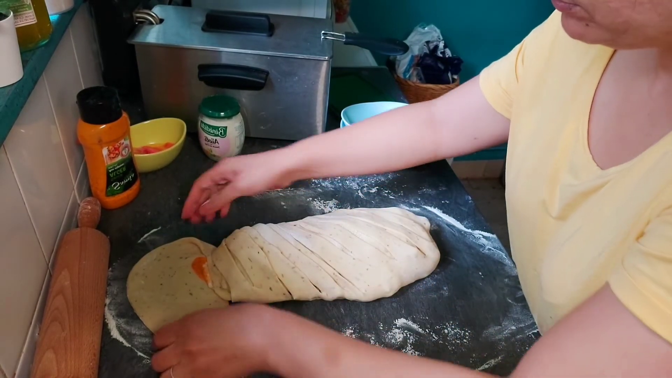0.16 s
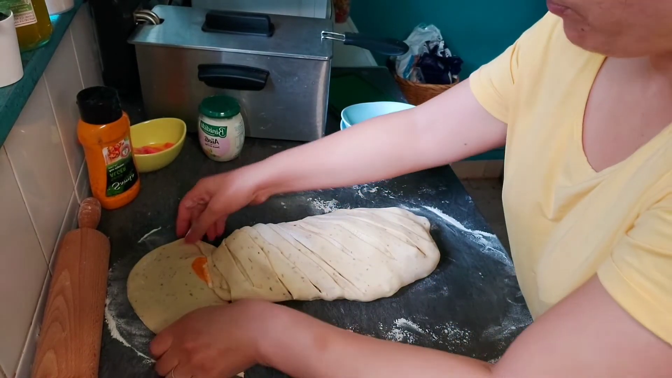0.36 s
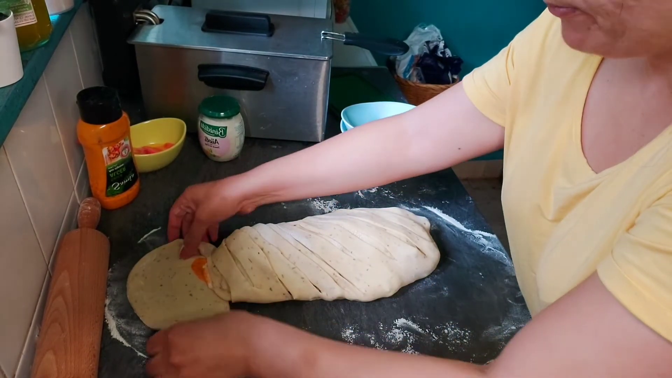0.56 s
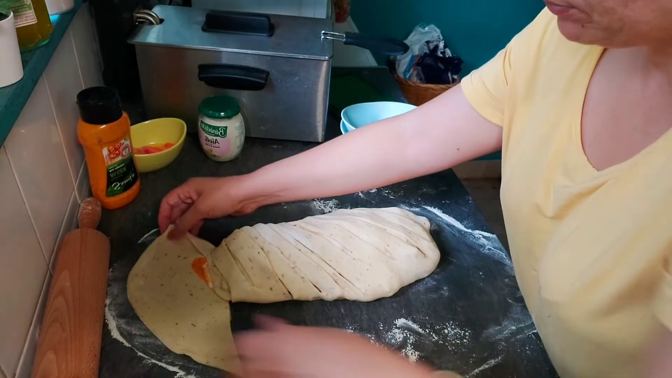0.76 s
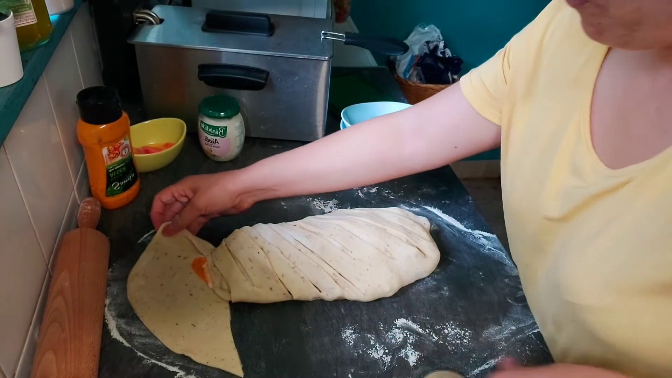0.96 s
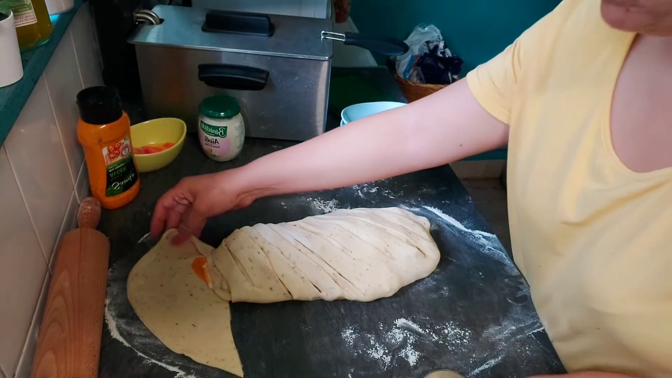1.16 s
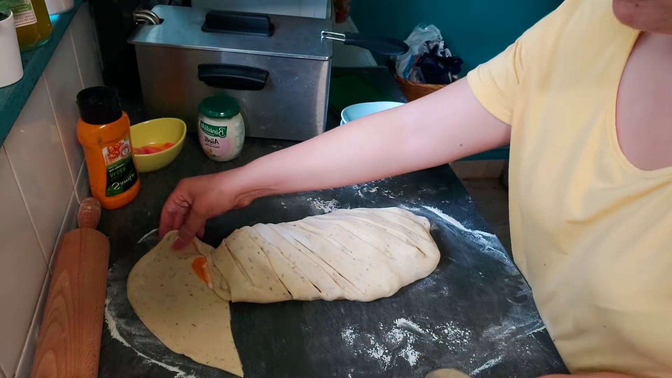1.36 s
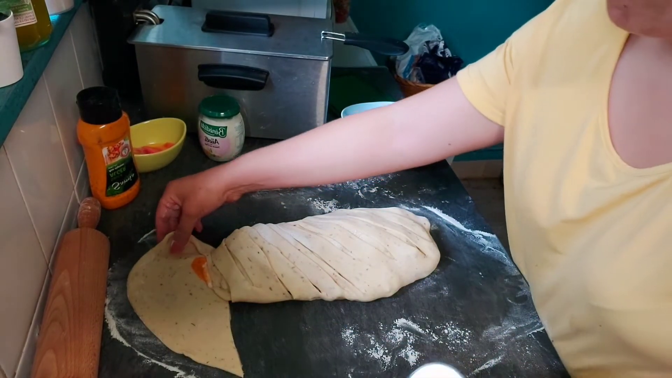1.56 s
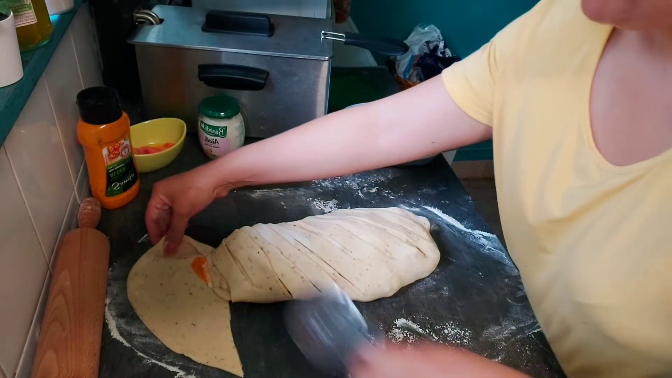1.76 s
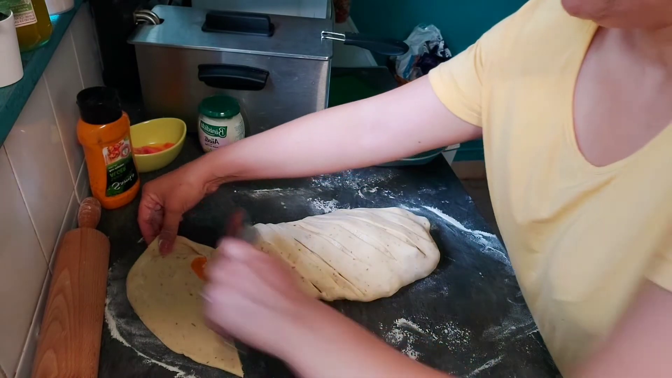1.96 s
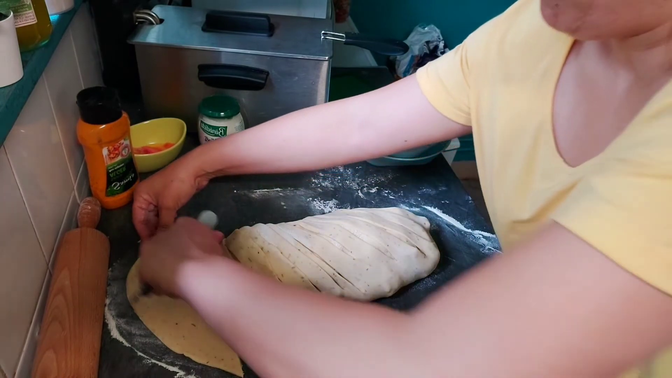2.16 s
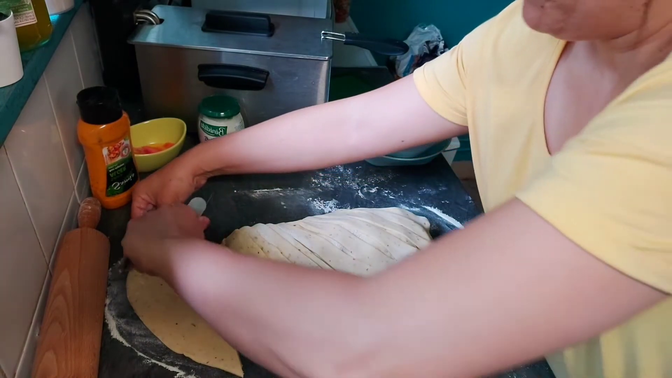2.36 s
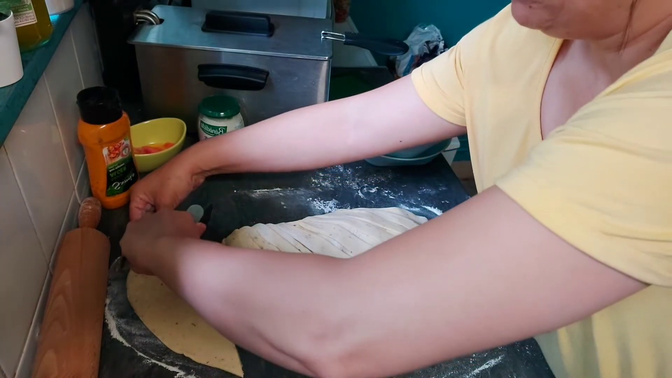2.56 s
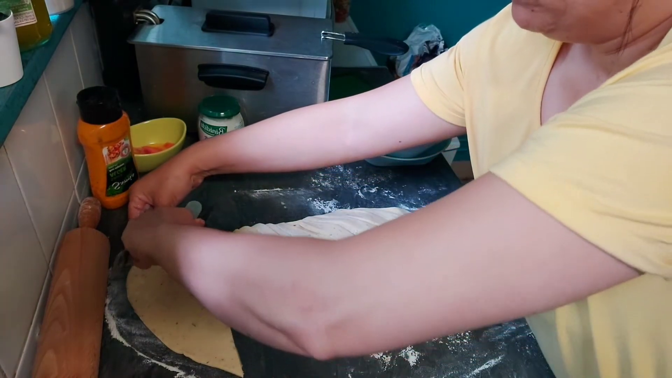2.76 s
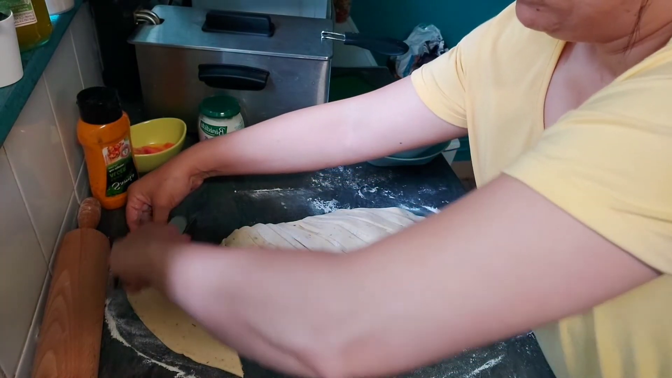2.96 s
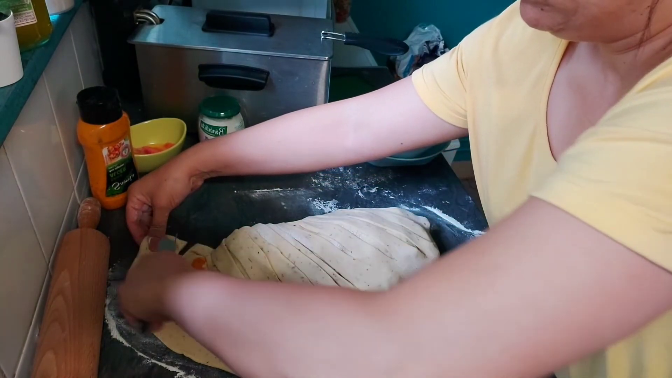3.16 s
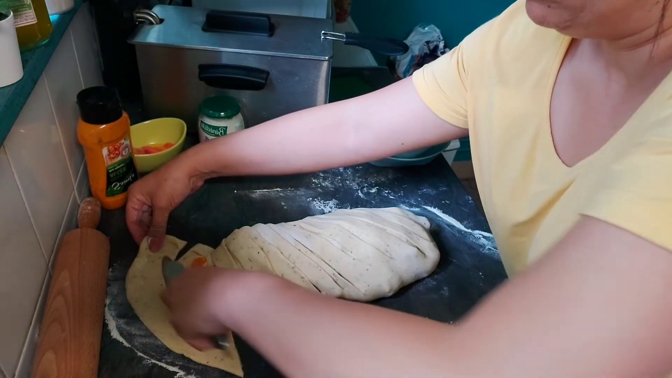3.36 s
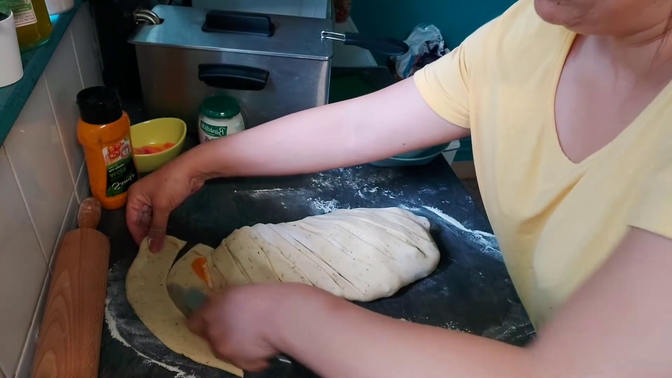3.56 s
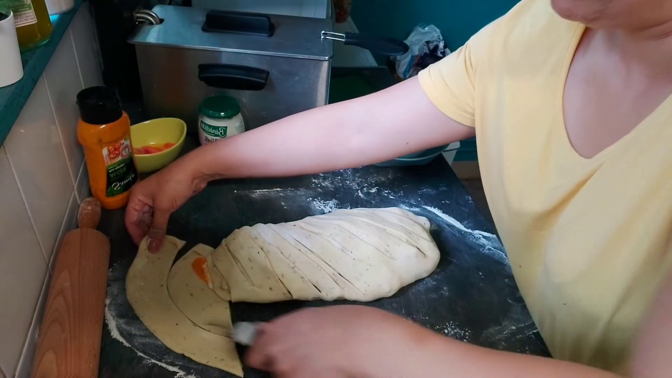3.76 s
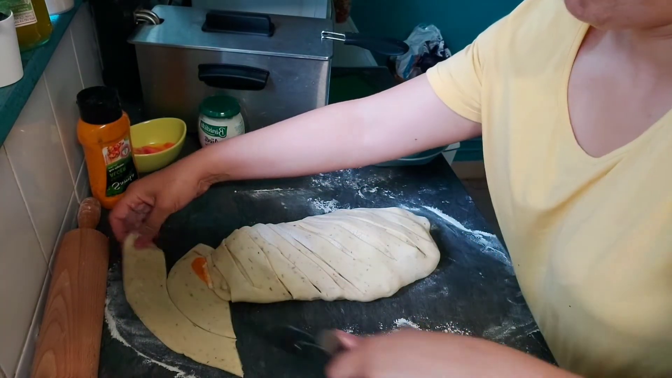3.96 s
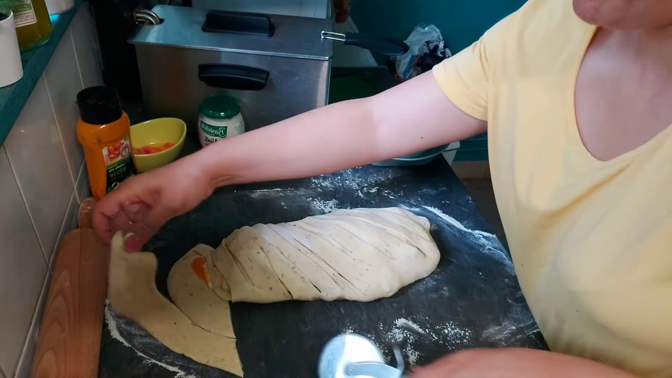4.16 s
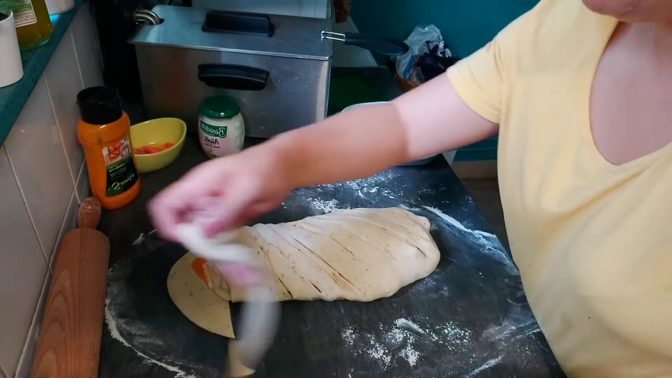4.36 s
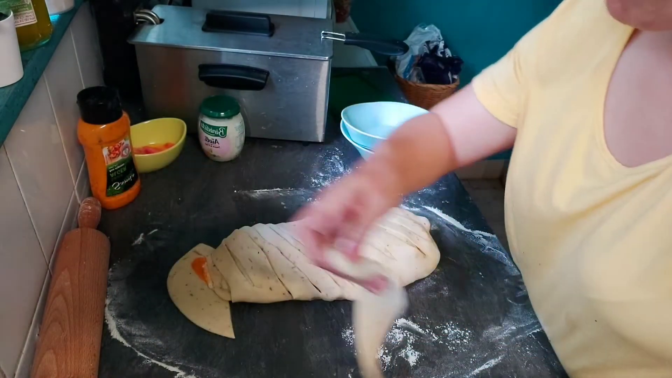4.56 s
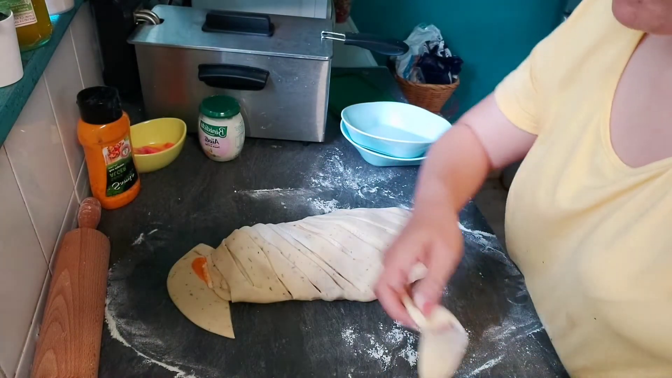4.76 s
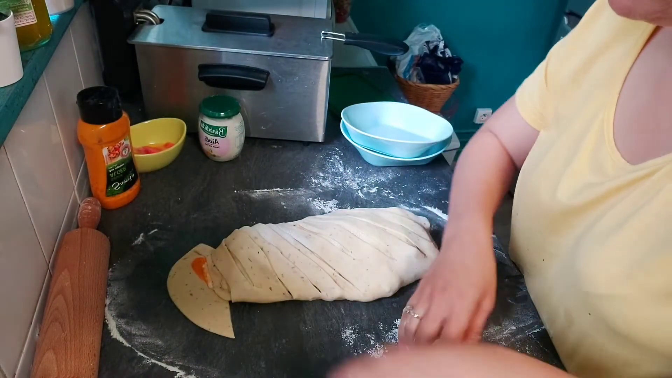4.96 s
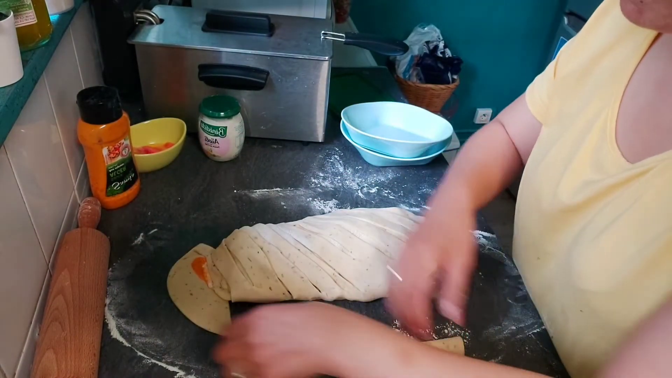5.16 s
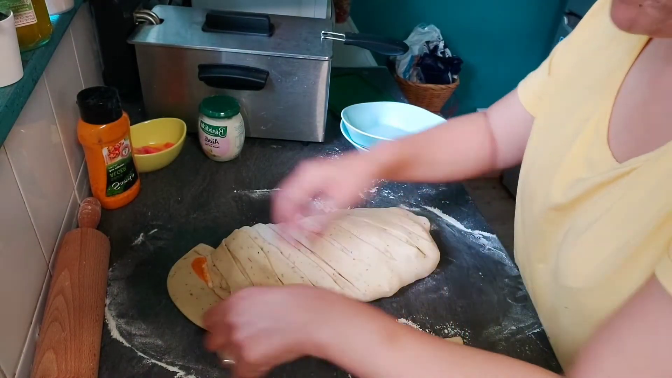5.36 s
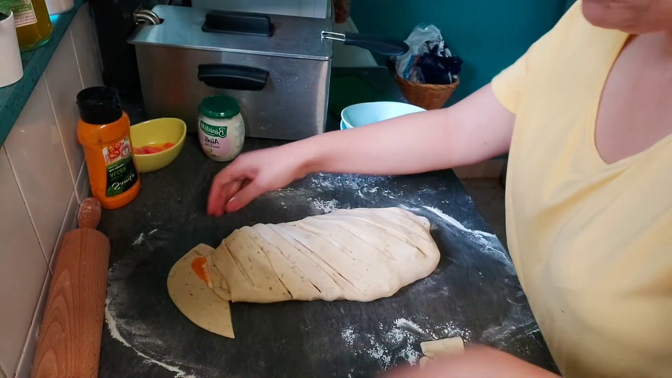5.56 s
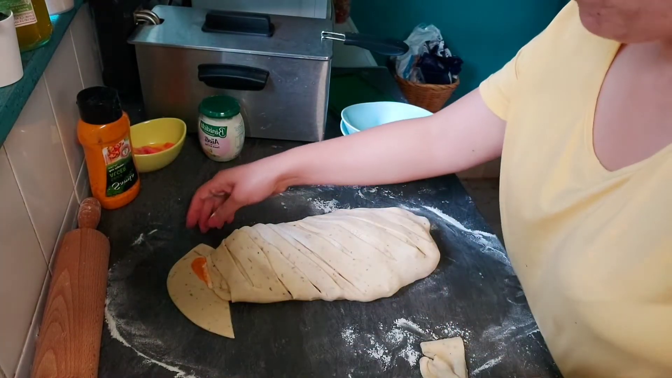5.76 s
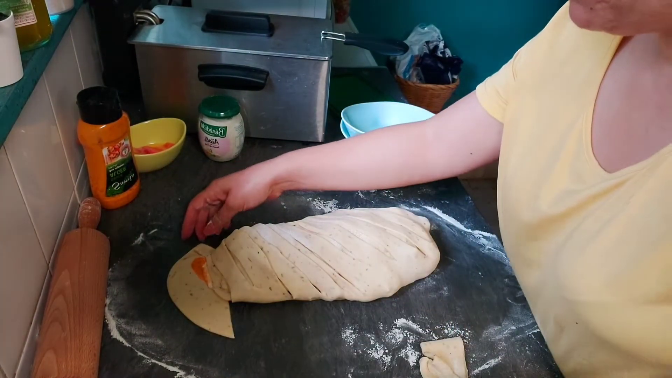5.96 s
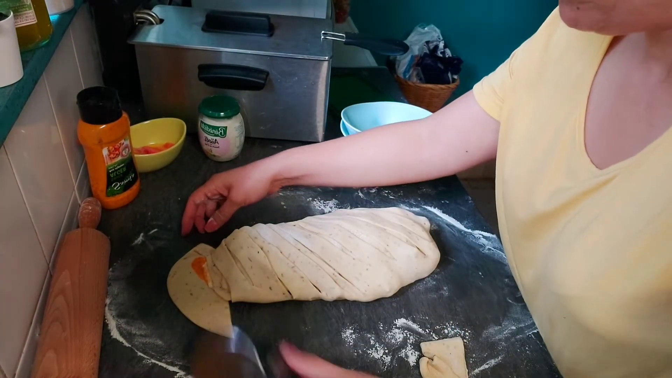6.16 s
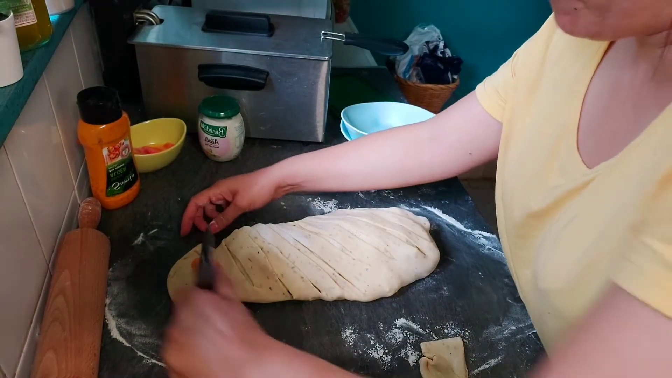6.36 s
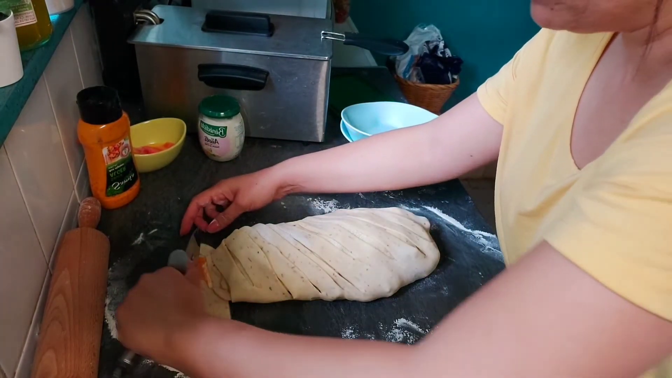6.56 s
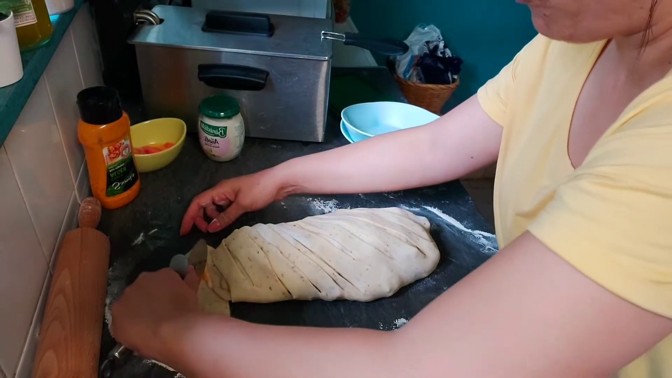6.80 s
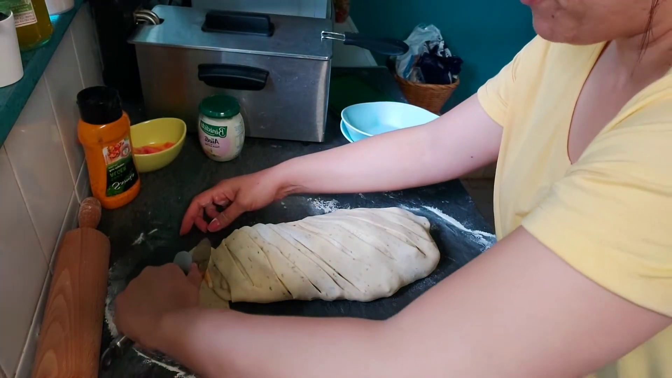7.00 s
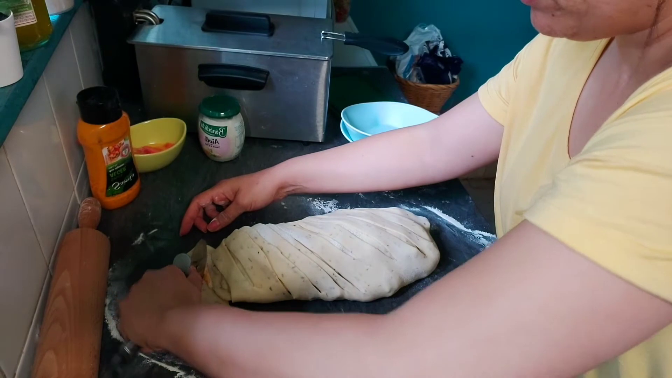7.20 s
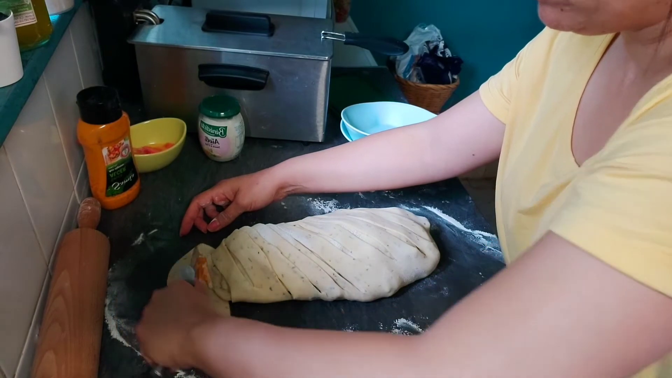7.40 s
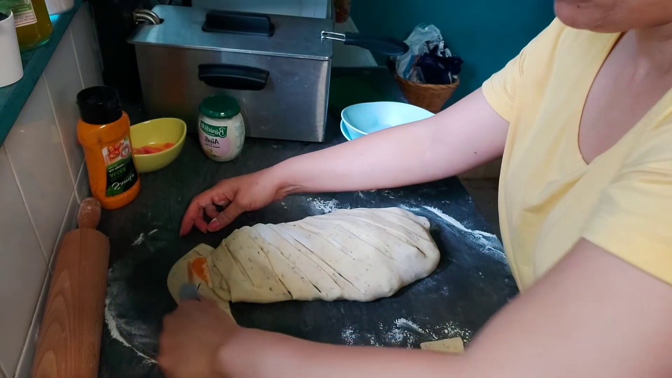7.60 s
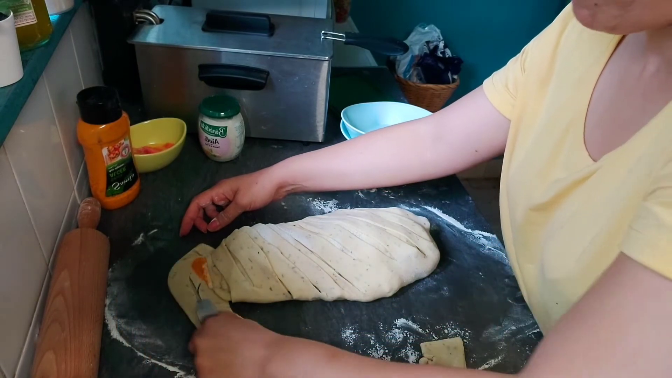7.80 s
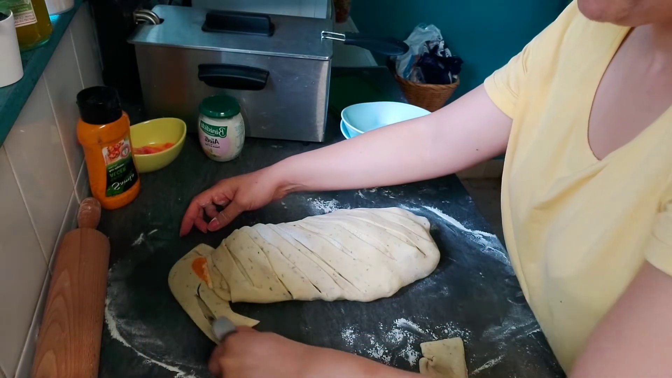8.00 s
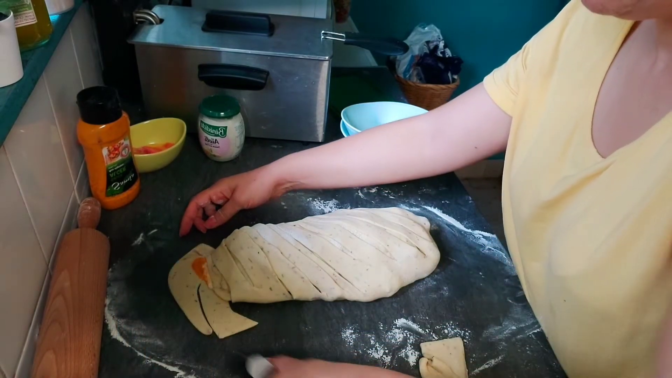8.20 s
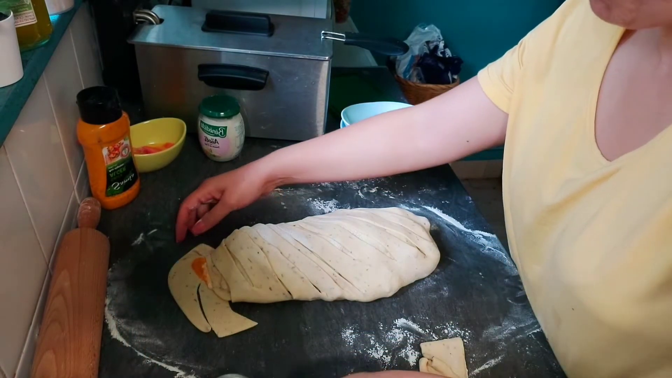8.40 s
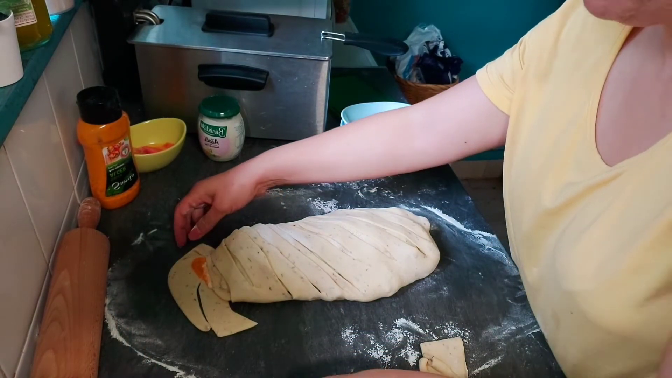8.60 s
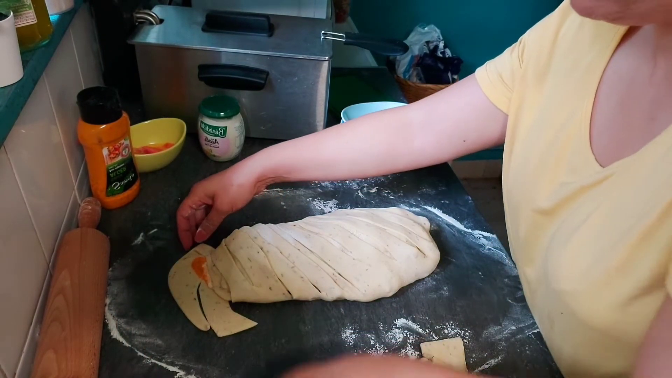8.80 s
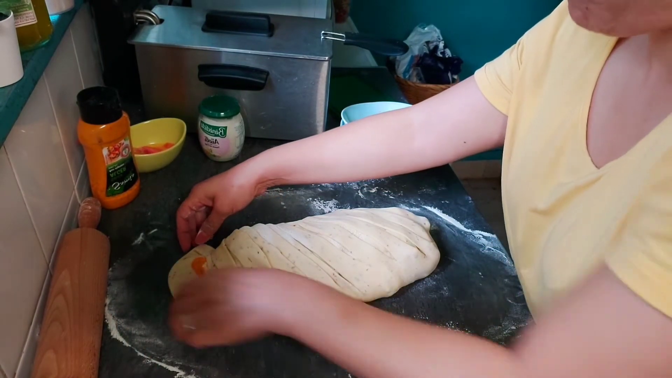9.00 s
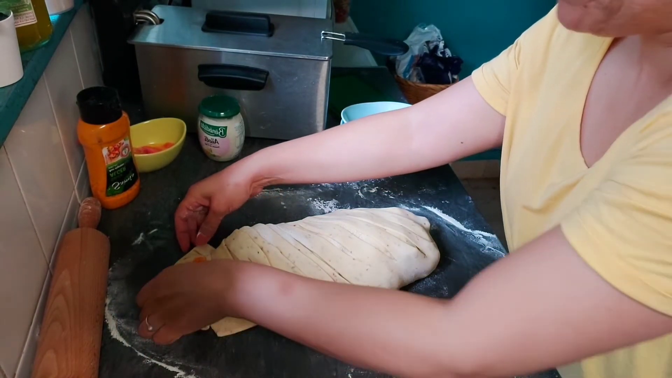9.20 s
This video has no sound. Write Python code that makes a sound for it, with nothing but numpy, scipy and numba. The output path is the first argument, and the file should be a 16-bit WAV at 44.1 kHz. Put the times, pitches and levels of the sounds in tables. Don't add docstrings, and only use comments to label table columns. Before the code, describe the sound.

A small loose steel dough cutter clacks and clinks on a stone counter, rolls through dough with soft rubbing rumbles, in a quietly ticking kitchen.

```python
import sys
import numpy as np
from scipy import signal
from scipy.fft import rfft, irfft
from scipy.io import wavfile
from numba import njit

SR = 44100
rng = np.random.default_rng(int(sys.argv[2]) if len(sys.argv) > 2 else 0)


def waveform_to_disk(signal):
    frames = np.transpose(np.atleast_2d(signal))
    scaled = np.clip(frames, -1, 1) * 32767
    samples = np.round(scaled).astype(np.int16)
    wavfile.write(sys.argv[1], SR, samples)


def magnitude_from_level(level_db):
    exponent = np.asarray(level_db, float) / 20
    return 10 ** exponent


N = 407660
TIME = np.arange(N) / SR

# pitch in Hz, level in dB.
AIR_COLOUR = [(15, -46.5), (25, -20), (65, 3), (103, 7.5), (182, -17.5), (288, -7.5), (669, -20),
              (979, -17.5), (1090, -9.5), (1360, -22.5), (2900, -30), (7300, -25.5), (10100, -35.5),
              (15200, -32), (16500, -55)]
# pitch in Hz, level in dB.
TICK_COLOUR = [(1470, -42.5), (2500, -10.5), (3140, -14), (4140, -5), (6210, -4.5), (7380, -1),
               (8900, -14.5), (13000, -23.5)]
# pitch in Hz, time to fade by 60 dB in seconds.
ROOM_FADE = [(120, 0.55), (400, 0.32), (2000, 0.31), (6000, 0.35), (14000, 0.13)]
# time in seconds, samples by which the left port hears it earlier.
LEFT_LEAD = [(0, 12), (1.2, 2), (2.2, 2), (2.6, 20), (3.3, 20), (3.8, 7), (4.2, 16), (5.2, 16), (5.6, 5),
             (6.6, 16), (7.5, 12), (8.7, 10), (9.1, 20)]

# pitch in Hz, level in dB, time to fade by 60 dB in seconds.
COUNTER_MODES = [(123, -21.5, 0.77), (204, -30, 0.6), (274.6, 0.5, 0.21), (405, -16.5, 0.094),
                 (601, -21, 0.18), (733, -24.5, 0.14), (900, -32, 0.23), (993, -20.5, 0.13),
                 (1334, -16, 0.04), (1630, -38, 0.33), (1821, -38.5, 0.26)]
# peak in seconds, deep rumble in dB, rise and fall in seconds.
PRESSES = [(.0, -50, 0.11, 0.047), (.266, -61.5, 0.03, 0.57), (.79, -72.5, 0.11, .6),
           (1.001, -57, 0.12, 0.16), (3.041, -54.5, 0.069, 0.061), (3.795, -32.5, 0.15, 0.045),
           (5.559, -56, 0.021, 0.26), (5.626, -46.5, 0.008, 0.25), (5.7, -61.5, 0.044, 0.066),
           (5.747, -35, 0.0273, 0.086), (7.636, -68.5, 0.093, 0.12), (8.168, -32, 0.18, 0.048),
           (1.512, -30.5, 0.16, 0.071), (9.09, -46, 0.042, 0.99)]
# peak in seconds, slab ring in dB, rub in dB relative to it,
# rise and fall in seconds.
ROLLS = [(0.37, -52.5, -20, 0.22, 0.1), (1.268, -33, -0.5, 0.027, 0.079), (2.611, -35, -4, 0.034, 0.24),
         (2.69, -39, -13, 0.077, 0.02), (3.45, -52, -13, 0.42, 0.29), (3.54, -34.5, -25.5, 0.032, 0.29),
         (5.731, -52.5, 2.5, 0.047, 0.068), (7.369, -61.5, 11, 0.1, 0.22), (7.469, -52, -2, 0.088, 0.32),
         (2.75, -46, -7.5, 0.025, 0.029), (7.728, -50, 4, 0.083, 0.035), (8.03, -54, 7.5, 0.073, 0.49),
         (7.6, -44.5, -9.5, 0.43, 0.26), (7.89, -44.5, -10, 0.24, 0.089), (8.172, -24, -10.5, 0.19, 0.019)]
# pitch in Hz, level in dB.
RUB_COLOUR = [(350, -28), (700, -4), (1000, 0), (1400, -6), (1900, -13), (2600, -20), (4500, -36)]
# pitch in Hz, level in dB.
GRIT_COLOUR = [(1180, -8), (2000, 3.5), (2760, -3), (6090, 9), (6590, 12), (8700, -22.5), (10300, -8),
               (16000, -42)]
# time in seconds, dB by which the upper squeak is raised and the lower
SQUEAK = [(2.5, 6.5), (3.3, -3), (5.8, 5.5), (7.35, 3), (7.5, 5.5), (7.65, 4), (7.8, -0.5), (7.95, 2.5),
          (8.2, 1.5)]
# pitch in Hz, level in dB.
DEEP_COLOUR = [(40, -31.5), (80, -19.5), (200, 0), (350, 2.5), (500, -7.0), (1000, -41.0)]
UPPER_COLOUR = [(250, -27.5), (450, 1.5), (700, 0.5), (900, -17.0), (1600, -47.0)]

# start in seconds, peak in
# dB, pitch in Hz, fade by 60 dB in seconds.
SPOT_TAPS = [(.001, -58, 2390, 0.17), (1.2583, -24.5, 3210, 0.027), (1.2577, -26.5, 4970, 0.022),
             (1.258, -22.5, 9160, 0.023), (1.3964, -14.5, 3460, 0.053), (1.3944, -12.5, 5400, 0.033),
             (1.573, -11.5, 5560, 0.025), (1.5718, -18, 8940, 0.023), (1.5734, -30, 2280, 0.033),
             (2.589, -34, 1190, .04), (2.6037, -36, 5560, 0.028), (2.6035, -51, 4300, 0.037),
             (2.641, -21.5, 1180, 0.093), (2.734, -40, 1305, .08), (2.735, -51, 490, 0.08),
             (3.5387, -25, 5500, 0.045), (3.5373, -20.5, 643, 0.059), (3.7272, -35, 5570, .05),
             (3.775, -29, 274.6, 0.26), (3.8074, -29.5, 1933, 0.053), (3.8054, -36, 3910, .2),
             (4.4003, -9, 7400, 0.1), (4.404, -16.5, 2860, 0.041), (4.3977, -19, 1810, .03),
             (4.4756, -20.5, 970, 0.023), (4.4745, -13.5, 1995, 0.07), (4.4785, -16, 650, 0.03),
             (4.7562, -28, 3580, 0.064), (4.794, -24, 466, 0.066), (4.7955, -38.5, 78, 0.82),
             (5.62, -51, 300, 0.23), (6.44, -49.5, 710, 0.17), (5.7383, -35.5, 2170, 0.038),
             (5.7566, -11, 2925, 0.042), (5.8268, -26, 3100, .03), (5.953, -31.5, 570, 0.16),
             (5.9919, -33, 3870, 0.14), (6.2377, -38, 3870, 0.16), (6.348, -30, 3908, .3),
             (8.156, -19, 1352, .12), (8.155, -27, 283, 0.26), (8.1638, -32.5, 3927, 0.19),
             (8.4139, -30, 3886, .3), (8.593, -9.5, 3630, 0.043), (8.6818, -16, 3310, 0.039),
             (8.8013, -12.5, 6440, 0.02), (8.8028, -30, 123, 1), (9.1004, -40.5, 3200, .03),
             (9.1149, -32, 250, .15),
             (1.243, -41, 82.5, .4), (1.3956, -10, 6810, 0.029), (1.5, -28, 280, 0.06),
                 (1.52, -38, 280, 0.049), (1.58, -33, 3890, 0.28), (1.796, -37, 3990, 0.38),
                 (1.797, -39, 1885, 0.074), (1.8793, -38, 3820, .05), (2.0379, -49, 2060, 0.09),
                 (2.1023, -45, 4400, 0.11), (4.392, -15, 1650, 0.034), (4.378, -36, 298, 0.17),
                 (4.41, -35, 297, 0.13), (4.459, -18, 930, 0.067), (4.4775, -6.5, 1540, 0.025),
                 (4.656, -37, 81, 0.39), (4.756, -30, 6800, .1), (4.7955, 0, 820, 0.0069),
                 (5.64, -48, 69, 0.42), (5.7555, -23, 900, 0.093), (5.7555, -26.5, 296, 0.097),
                 (5.86, -36.5, 75.4, 0.54), (6.0194, -22, 5700, 0.022), (6.0194, -39, 8500, .02),
                 (8.5996, -10.5, 4600, 0.0099), (8.602, -37.5, 76.7, 0.91), (8.7069, -18, 4080, .025),
                 (8.8004, -19, 1130, 0.035), (8.825, -21.5, 1010, 0.044), (6.258, -36.5, 3910, 0.15),
                 (8.532, -43, 3890, .1), (9.09, -40.5, 90, 0.59), (9.1139, -26.5, 3854, 0.1),
                 (8.681, -35, 3905, 0.27), (8.7423, -28, 3910, 0.14), (8.82, -34.5, 3880, .45),
                 (6.021, -40, 3920, 0.21), (1.2578, -25, 7640, .015), (1.2575, -23, 12300, .02),
                 (2.652, -43, 2600, 0.071), (2.615, -45, 6770, 0.082), (2.623, -32, 1450, 0.14),
                 (2.736, -46.5, 5600, 0.054), (2.743, -50, 784, 0.056), (3.911, -46, 4860, .02),
                 (6.02, -16, 11700, .03), (5.966, -34, 463, 0.068), (6.369, -38, 6620, 0.14),
                 (8.589, -6, 10300, 0.0072), (8.711, -14.5, 5500, .025)]

# start in seconds, crack peak in dB, then relative to the crack
# counter thud, handle knock and hardness in dB.
BLOWS = [(1.2393, -30, -15.5, 10, -8), (1.3805, -20.5, -8.5, -9.5, -8), (1.4878, -23.5, -3, -1.5, -1),
         (3.725, -30, -0.5, 7.5, 0), (3.8075, -29, -11.5, -21.5, 1), (4.359, -41.5, -27, -23, -11),
         (4.3907, -20, -6.5, -10.5, -3), (4.4737, -11.5, -3.5, 4.5, -5.5), (4.6553, -13, 6, -7.5, 3),
         (4.7571, -23, 3, 0.5, 1), (4.792, -19.5, 12.5, 7, -0.5), (5.7562, -19, -6, -1, -4.5),
         (5.85, -14, 9.5, -35, -4.5), (8.1613, -18.5, 0, -4.5, -17), (8.5882, -9, -15, -15, 0),
         (8.682, -17, -1.5, -2.5, -1.5), (8.8006, -22.5, 11.5, 1, 3.5), (9.0827, -54, 25, 8, -26),
         (9.1134, -26.5, -12, 5, 6)]
# start in seconds, crack peak, counter thud and handle knock in dB.
BOUNCES = [(1.256, -38, 15.5, -5.5), (1.3898, -10, 1.5, -22), (1.5207, -24, -6, -6),
           (4.378, -27.5, -10.5, -0.5), (4.3986, -6.5, -5, -13), (4.4145, -18.5, -2, -24),
           (4.807, -13, 3, -39), (4.822, -25, 12.5, 5.5), (4.85, -30.5, -18, 8.5), (5.823, -40.5, 1, 16.5),
           (5.858, -13, 4.5, -28), (5.8845, -25.5, -11, -1), (5.953, -37, 8.5, 4.5),
           (8.189, -24.5, 2, -47.5), (8.5994, -12.5, 4.5, -7), (8.7076, -18.5, -5, 2),
           (8.7409, -21.5, 4, -16), (8.8195, -17, -2, 0.5), (8.9548, -49, -8, 11.5)]
# start in seconds, crack peak, handle knock and hardness in dB.
CLINKS = [(1.572, -21.5, -22, -3), (1.794, -27, -56, 4.5), (1.8753, -38.5, -7.5, 4),
          (2.0378, -36, -52, 9.5), (2.0997, -35.5, -14.5, 5), (3.5256, -32, 5.5, -3.5), (3.542, -31, -6, 8),
          (3.9542, -37.5, -14.5, -3), (3.9953, -33, -21, -14), (4.032, -39.5, -30, -7),
          (4.251, -41, -30, -25), (4.3427, -50.5, -30, -12), (5.9921, -16.5, -15, -5.5),
          (6.02, -22, -26, -24), (6.1885, -34, -25.5, -6), (6.234, -22, -21.5, -7),
          (6.2548, -32, -46.5, 7.5), (6.3421, -16.5, -27, -11), (6.4268, -27, -17.5, -8.5),
          (8.341, -29.5, -59, -18), (8.364, -39.5, -51, 3.5), (8.416, -20.5, -58.5, -13.5),
          (8.4227, -26.5, -45, -16), (8.525, -21.5, -22.5, -3.5), (8.5938, -9.5, -7.5, 3.5)]
SLIDES_S = [3.9562, 3.9957, 6.1887, 6.234, 6.2559, 6.3425, 6.4288, 8.527, 8.682]
CLACKS_S = (8.58, 8.597)
# pitch in Hz, level in dB.
CRACK_COLOUR = [(1060, -41), (1800, -17), (2080, -38.5), (3200, -17), (4350, -15), (5500, -11.5),
                (6650, -8), (7560, -4.5), (9330, -10.5), (11600, -0.5), (16000, -31.5)]
# pitch in Hz, level in dB.
THUD_COLOUR = [(90, -48.5), (140, -11.0), (280, -11.5), (500, -25.5), (1000, -25.0), (3000, -59.5)]

RING_HZ = [
    [6708, 6792],
    [3870, 3910],
    [10130, 10165],
    [7350, 7470, 7655, 11300, 11370, 11467, 11580],
    [13975, 14000],
]
# level in dB, time to fade by 60 dB in seconds.
RING_SHAPE = [
    [(-1.5, 0.29), (-13, 0.68)],
    [(-11.5, 0.084), (-3.5, 0.16)],
    [(-11, 0.25), (0.5, 0.057)],
    [(-21, 0.036), (-25, 0.13), (-15, 0.14), (-13, 0.083), (3.5, .07), (-6, 0.11), (-8, 0.089)],
    [(-9, .1), (-4, 0.082)],
]
# start in seconds, fork pair, seated rim, arm and tip in dB.
SLAB_JOLTS = [(1.256, -47.5, -68.5, -60.5), (1.394, -35, -31.5, -31), (1.503, -39, -70, -27.5),
              (4.4005, -29.5, -14.5, -33), (4.655, -30.5, -21, -37), (4.7602, -20.5, -53, -41),
              (4.8045, -32.5, -16, -40.5), (5.7543, -53.5, -35.5, -50), (5.8642, -47, -22.5, -37),
              (8.6825, -25, -24, -49), (9.1169, -34.5, -30.5, -29)]
# start in seconds, fork pair, rim, arm and tip, root in dB.
HAND_JOLTS = [(1.5705, -31.5, -29, -30, -35), (1.7943, -58, -24.5, -45, -29.5), (1.878, -32, -46, -33, -66),
              (2.039, -49, -40, -44, -72), (2.1037, -47, -57, -34.5, -57), (3.809, -63, -51, -46, -57),
              (3.9984, -55, -64, -56, -72), (4.253, -79, -88, -83, -57), (4.36, -42, -57, -63, -31.5),
              (5.9924, -34, -26, -53, -36), (6.02, -47, -31, -27, -38), (6.232, -34, -48, -43, -52),
              (6.2596, -38, -48, -39, -33.5), (6.3462, -35, -29, -33.5, -42), (8.164, -45, -41, -29.5, -55),
              (8.1904, -42, -42, -36.5, -65), (8.4146, -27, -28.5, -30, -29.5), (8.53, -56, -38, -51, -46),
              (8.5985, -27, -18, -36, -23), (8.8014, -36, -26.5, -38, -27.5)]

# start in seconds, lowest mode, second mode, next two modes
# and top two modes in dB.
WHEEL_STRIKES = [
    (1.573, -60.5, -67, -66, -52),
    (1.796, -62, -61, -69, -44),
    (2.105, -68, -56.5, -52.5, -40),
    (3.999, -82, -75, -69, -62),
    (4.805, -55, -52.5, -47, -38.5),
    (6.02, -58.5, -51, -43.5, -40),
    (8.412, -54, -60, -39, -34),
    (8.8, -56.5, -68, -51, -56),
    (9.116, -62, -64, -44, -31),
]
WHEEL_HZ = [2498, 4294, 6492, 9068, 12015, 15290]
WHEEL_T60_S = [3.2, 2.6, 1.7, 1.0, 0.55, 0.22]
WHEEL_PAIR_DB = [-7, -3]
# beats per second, depth at the left port, seconds to the first null,
# left port over right in dB.
WHEEL_SWAY = [(1.6, .8, .42, -9), (3.2, 0.64, .36, 1), (4.1, 0.41, .1, -3), (5.499, .8, 0.14, -11),
              (7.501, 0.67, 0.062, -3.5), (9, .6, .05, -2.5)]
GRIPS = [(2.46, 3.9), (4.2, 4.7), (5.76, 6.0), (6.24, 8.3), (8.6, 8.79)]

SPOT_DB = 2.0


def colour(x, table):
    hz, db = np.transpose(table)
    log_hz = np.log(np.fft.rfftfreq(4096, 1 / SR) + 1)
    log_gain = np.interp(log_hz, np.log(hz), db) * np.log(10) / 20
    cepstrum = irfft(log_gain)
    cepstrum[1:2048] *= 2
    cepstrum[2049:] = 0
    taps = irfft(np.exp(rfft(cepstrum)))[:2048]
    return signal.fftconvolve(x, taps / np.sqrt(np.sum(taps ** 2)))[:len(x)]


@njit
def bank(x, who, gain, hz, loss, choke):
    y = np.zeros(len(x))
    for k in range(len(hz)):
        z, turn = 0j, np.exp(2j * np.pi * hz[k] / SR)
        for i in range(len(x)):
            z = z * turn * (1 - loss[k] - choke[i]) + gain[who[i], k] * x[i] + 1e-18
            y[i] += z.imag
    return y


def body(push, modes, who, scatter_db, choke=0 * TIME):
    hz, db, t60 = np.transpose(modes).astype(float)
    gain = magnitude_from_level(db + scatter_db * rng.standard_normal((who.max() + 1, len(modes))))
    loss = np.log(1000) / (np.maximum(t60, .003) * SR)
    return bank(push, who, gain, hz.copy(), loss, choke)


def contacts(rate, spread_db):
    hits = rng.random(N) < rate / SR
    x = hits * rng.standard_normal(N) * magnitude_from_level(spread_db * rng.exponential(size=N))
    return x / x.std()


def latest(s):
    who = np.maximum(np.searchsorted(s, TIME, "right") - 1, 0)
    return who, TIME - s[who]


def swell(s, db, rise_s, fall_s):
    before = (s - TIME) / max(rise_s, .005)
    after = (TIME - s) / max(fall_s, .005)
    return magnitude_from_level(db - 30 * np.where(TIME < s, before, after))


def air():
    mid, side = (colour(rng.standard_normal(N), AIR_COLOUR) for _ in range(2))
    side = signal.sosfilt(signal.butter(1, 350, "high", fs=SR, output="sos"), side)
    hum = magnitude_from_level(-77.0) * np.sin(2 * np.pi * 120.0 * TIME)
    whine = magnitude_from_level(-112) * body(rng.standard_normal(N), [(1160, 0.006, 0.2)], np.zeros(N, int), 0)
    return magnitude_from_level(-61 - 6.5) * (mid + side * np.array([[1], [-1]])) + hum + whine


def ticks():
    start_s, period_s = .118, .2719
    beat, age = np.divmod(TIME - start_s + period_s, period_s)
    strength = magnitude_from_level(-64.0 + 1.3 * rng.standard_normal(40))[beat.astype(int)]
    shape = np.clip(age / .012, 0, 1) * np.exp(-age / .05)
    noise = np.array([colour(rng.standard_normal(N), TICK_COLOUR) for _ in range(2)])
    return noise * strength * shape


def room(x):
    age = np.arange(int(.8 * SR)) / SR
    hz, t60 = np.transpose(ROOM_FADE)
    tail = 0
    for centre in 60 * 2. ** np.arange(0, 8.5):
        edges = [centre / 1.41, min(centre * 1.41, 21000)]
        band = signal.butter(2, edges, "band", fs=SR, output="sos")
        mid, side = signal.sosfilt(band, rng.standard_normal((2, len(age))))
        decay = magnitude_from_level(-60 * age / np.interp(np.log(centre), np.log(hz), t60))
        width = min(0.13 + centre / 1000.0, 1)
        tail = tail + decay * (mid + width * side * np.array([[1], [-1]]))
    tail = tail * np.clip(age / 0.0073, 0, 1) / np.sqrt(np.sum(tail ** 2) / 2)
    return signal.fftconvolve(x[None], tail, axes=1)[:, :N]


def rolls():
    pressing = sum(swell(*row) for row in PRESSES)
    layers = np.outer(magnitude_from_level([0, -9.5, -15.5, -25]), pressing)
    for s, db, rub_db, rise_s, fall_s in ROLLS:
        layers += np.outer(magnitude_from_level([-9.5, 0, rub_db, rub_db - 14]), swell(s, db, rise_s, fall_s))
    deep, ring, rub, grit = layers * [contacts(rate, 1.2) for rate in (900, 1200, 2000, 4000)]
    squeak = magnitude_from_level(np.interp(TIME, *np.transpose(SQUEAK)))
    spot = (TIME * 6).astype(int)

    slab = body(deep * magnitude_from_level(-31.5), COUNTER_MODES[1:4], spot, 0.97)
    slab += magnitude_from_level(-1.5) * colour(deep, DEEP_COLOUR)
    upper = body(ring * magnitude_from_level(-24.5), COUNTER_MODES[4:6], spot, 2.0)
    upper += magnitude_from_level(-3.0) * colour(ring, UPPER_COLOUR)
    upper += body(rub * magnitude_from_level(-23.0), COUNTER_MODES[6:], spot, 0.74)
    low_squeak = colour(rub / squeak, RUB_COLOUR[:3] + [(1500, -27.5)])
    high_squeak = colour(rub * squeak, [(500, -23.5)] + RUB_COLOUR[2:])
    upper += magnitude_from_level(-4.0) * (low_squeak + high_squeak)
    return upper + magnitude_from_level(-1.0) * colour(grit, GRIT_COLOUR), slab


def taps():
    out, age = np.zeros((2, N + SR)), np.arange(SR) / SR
    for s, db, hz, t60 in SPOT_TAPS:
        tone = np.sin(2 * np.pi * hz * age)
        if abs(hz - RING_HZ[1][1]) > 110:
            tone += magnitude_from_level(-7 - 60 * age / 0.022) * np.sin(2 * np.pi * hz * 1.05 * age)
        start = int(s * SR)
        out[int(hz < 400), start:start + SR] += magnitude_from_level(db - 60 * age / max(t60, .005)) * tone
    return out[:, :N]


def contact_list():
    bounce_hard_db, clink_thud_db = -2.5, -46
    rows = [(*row, 0.006) for row in BLOWS]
    rows += [(*row, bounce_hard_db, 0.011) for row in BOUNCES]
    rows += [(s, db, clink_thud_db, handle, hard, 0.0046) for s, db, handle, hard in CLINKS]
    *columns, chatter_s = np.transpose(sorted(rows))
    s = columns[0]
    chatter_s = np.where(np.diff(s, append=N) < .02, .012, chatter_s)
    clack = (s > CLACKS_S[0]) & (s < CLACKS_S[1])
    return (*columns, np.where(clack, .002, chatter_s))


def knocks():
    s, db, thud_db, handle_db, hard_db, chatter_s = contact_list()
    who, age = latest(s)
    slides = (np.abs(s[:, None] - SLIDES_S).min(axis=1) < .003)[who]
    shape = (age >= 0) * np.exp(-np.abs(age) / np.maximum(chatter_s[who], .002))
    shape = shape * np.where(slides, 2 * np.clip(age / 0.0038, 0, 1), 1)
    first_hit = age < 1 / SR
    push = magnitude_from_level(db[who]) * shape * (magnitude_from_level(-11) * contacts(3500, 1.5) + magnitude_from_level(-5.0) * first_hit)

    hz = np.geomspace(1800, 15800, 30)
    t60 = .016 * (2000 / hz) ** .5
    crack_hz, crack_db = np.transpose(CRACK_COLOUR)
    crack = np.array([hz, np.interp(np.log(hz), np.log(crack_hz), crack_db), t60]).T
    dull = body(push * magnitude_from_level(-9.5), crack[hz < 6200], who, 3.5)
    sharp = body(push * magnitude_from_level(hard_db[who] - 7), crack[hz >= 6200], who, 4.)

    handle = [(f, -3, .025) for f in np.geomspace(500, 1900, 8)]
    knock = body(push * magnitude_from_level(handle_db[who] - 19.5), handle, who, SPOT_DB)
    knock += body(push * magnitude_from_level(handle_db[who] - 13.5), COUNTER_MODES[4:], who, 1.2)

    slab = push * magnitude_from_level(thud_db[who])
    cabinet_loss = np.full(N, 24 / SR)
    thud = body(slab * magnitude_from_level(-17.0), COUNTER_MODES[:4], who, SPOT_DB, cabinet_loss)
    return dull + sharp, knock, thud + colour(slab, THUD_COLOUR)


def rings():
    jolts = [(*row, row[2] - 3.5) for row in SLAB_JOLTS] + HAND_JOLTS
    s, pair, rim, arm, root = np.transpose(sorted(jolts))
    strengths = [pair, root, arm, rim, arm + 5.5]
    who, age = latest(s)
    shape = (age >= 0) * np.exp(-np.abs(age) / .006)
    jolt = shape * (magnitude_from_level(-19.0) * contacts(4300, 3.8) + (age < 1 / SR))
    in_dough = np.abs(TIME - 7) < .55
    loss = 6 / SR + 60 / SR * in_dough
    out = 0
    for db, hz, ring in zip(strengths, RING_HZ, RING_SHAPE):
        out = out + body(jolt * magnitude_from_level(db[who]), np.column_stack([hz, ring]), who, SPOT_DB / 2, loss)
    return out


def wheel():
    s, first, second, *pairs = np.transpose(WHEEL_STRIKES)
    strengths = [first, second]
    for db, upper_db in zip(pairs, WHEEL_PAIR_DB):
        strengths += [db, db + upper_db]
    who, age = latest(s)
    gripped = sum((TIME > a) & (TIME < b) for a, b in GRIPS)
    choke_db = np.cumsum(gripped) * 499 / SR
    choke_db = choke_db - np.interp(s, TIME, choke_db)[who]
    out = 0
    for hz, t60, db, sway in zip(WHEEL_HZ, WHEEL_T60_S, strengths, WHEEL_SWAY):
        rate, depth, null_s, pan_db = sway
        turn = 2 * np.pi * rate * (age - null_s) + rng.uniform(0, 2 * np.pi, (2, 1)) * [[0], [1]]
        wobble = 1 - min(depth, .95) * np.array([[1], [.45]]) * np.cos(turn)
        tone = np.sin(2 * np.pi * hz * TIME + rng.uniform(0, 1.2, (2, 1)))
        fade = magnitude_from_level(db[who] - 4 - 60 * np.abs(age) / t60 - choke_db * hz / 8980)
        pan = magnitude_from_level([[pan_db / 2], [-pan_db / 2]])
        out = out + np.clip(age / .04, 0, 1) * pan * fade * wobble * tone
    return out


def scene():
    crack, knock, thud = knocks()
    rub, rumble = rolls()
    spot, boom = taps()
    steel = signal.sosfilt(signal.butter(6, 1650, "high", fs=SR, output="sos"), crack + rings())
    thud = signal.sosfilt(signal.butter(4, 105, "high", fs=SR, output="sos"), thud)
    near = steel + knock + rub + spot
    slab = thud + rumble + boom

    lead = np.interp(TIME, *np.transpose(LEFT_LEAD)).round()
    late = np.interp(np.arange(N) - lead, np.arange(N), near)
    direct = np.array([near * magnitude_from_level(-1.4), late * magnitude_from_level(1.4)]) + slab * magnitude_from_level([[-.5], [.5]])
    to_room = near - 0.39 * rub - (1 - magnitude_from_level(-11)) * spot + magnitude_from_level(-11.5) * slab
    background = (ticks() + air()) * magnitude_from_level([[-.7], [.7]])
    return magnitude_from_level(-3.5) * direct + magnitude_from_level(-1.5) * room(to_room) + wheel() + background


def roll_off(x):
    return signal.sosfilt(signal.butter(12, 17000, fs=SR, output="sos"), x)


def record(dry):
    heard = signal.sosfilt(signal.butter(4, 55, "high", fs=SR, output="sos"), dry)
    heard = heard - 0.71 * signal.lfilter(*signal.iirpeak(6150, 12, SR), heard)
    peak = 1.05
    rounded = peak * np.tanh(heard * magnitude_from_level(0.8) / peak)
    top = signal.ellip(8, .2, 70, 15950, fs=SR, output="sos")
    return roll_off(signal.sosfilt(top, rounded))


dry = scene()
out = record(dry)
waveform_to_disk(out)
```